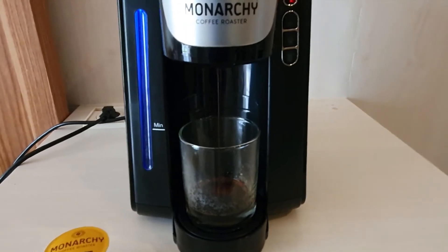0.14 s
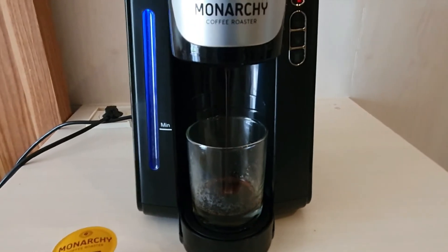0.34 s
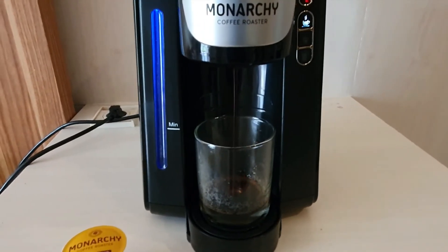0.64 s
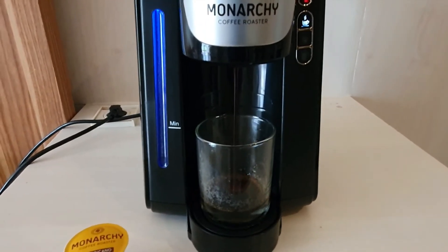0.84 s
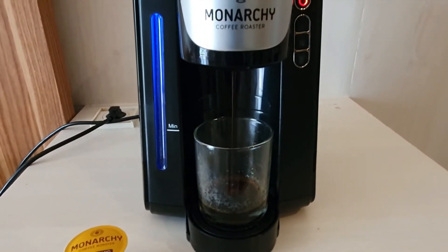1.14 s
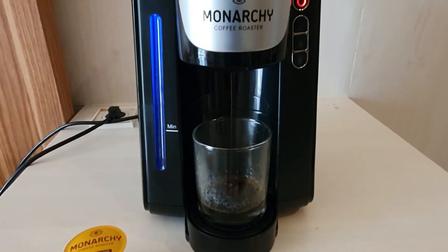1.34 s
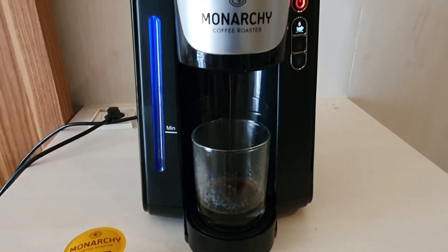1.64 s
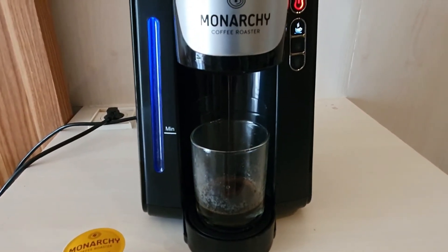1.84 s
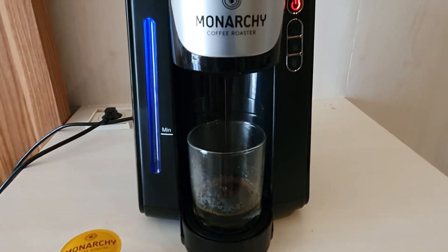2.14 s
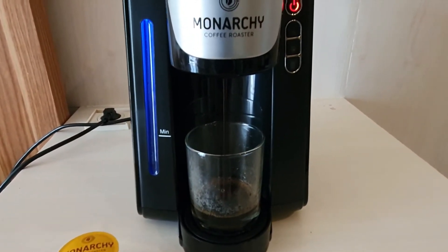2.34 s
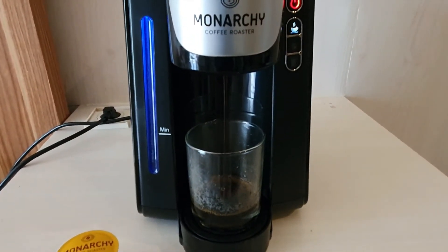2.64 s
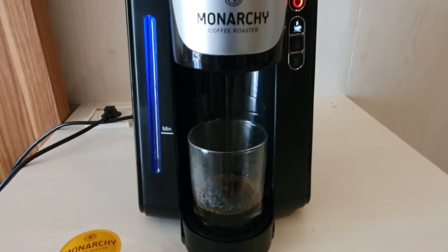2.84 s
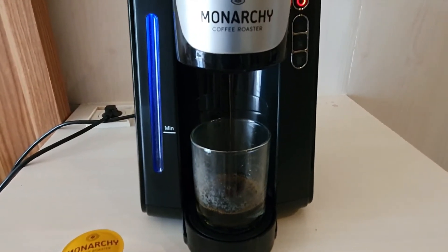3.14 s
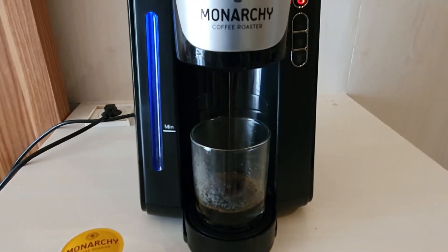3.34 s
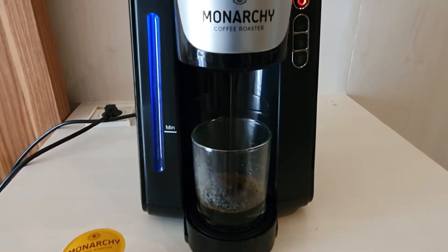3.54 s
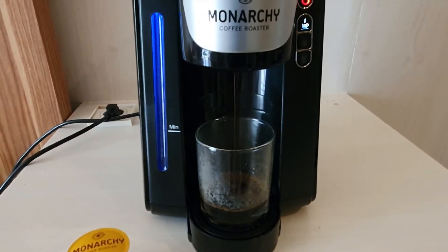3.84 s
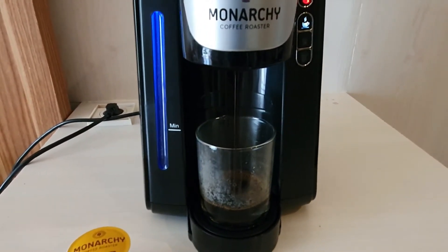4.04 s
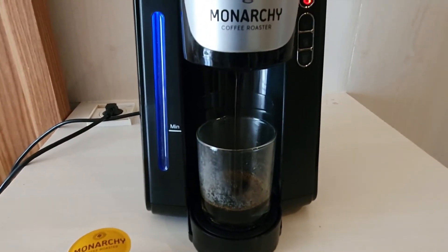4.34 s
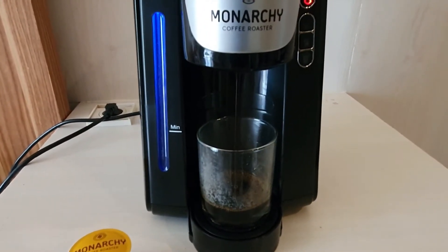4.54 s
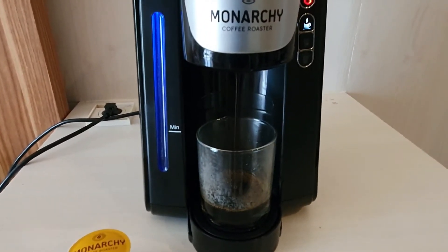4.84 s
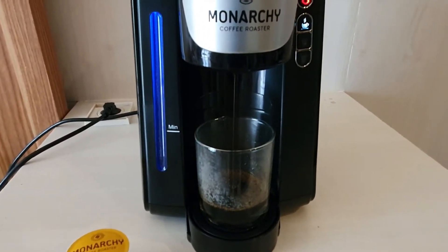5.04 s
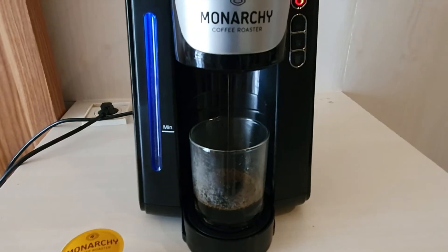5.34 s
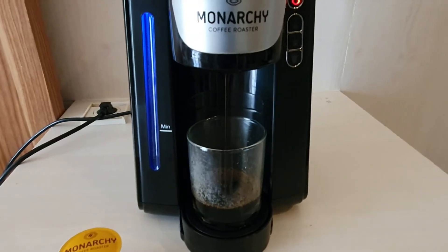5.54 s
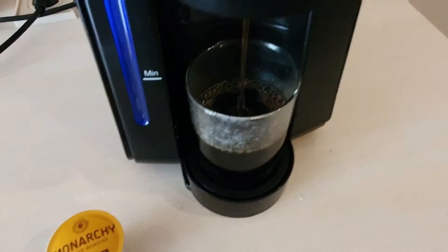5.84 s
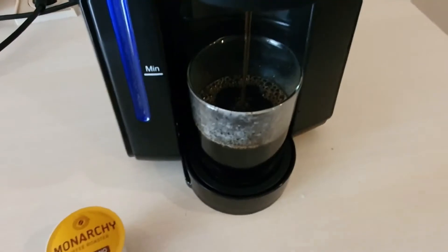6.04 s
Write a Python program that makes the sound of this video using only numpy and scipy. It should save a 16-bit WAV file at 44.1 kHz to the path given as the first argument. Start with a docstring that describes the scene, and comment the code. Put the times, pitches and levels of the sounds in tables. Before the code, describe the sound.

In a small room, coffee trickles from a nearby coffee maker into a glass, with a light hiss and fine spattering ticks. Small plops and bright plinks soon join in and build into a busy, gentle gurgle as the ticks thin out. The pump's low hum and the rumble of water inside the machine run throughout, turning closer and louder in the last moment.

```python
"""A small room: a capsule coffee maker runs a thin stream of coffee into a glass standing in its bay.
As the pool deepens, the stream drags in ever larger bubbles that plop; small ones burst at the surface
and spray ticks on the glass. The air in the glass rings, and the bay and the room reflect the pour.
The stream hisses, the pump hums on the mains and water rumbles inside the machine.
Near the end the machine is heard from closer, and its hum and rumble grow louder."""
import sys
import numpy as np
from scipy import signal
from scipy.fft import rfft, irfft
from scipy.io import wavfile

SR = 44100
rng = np.random.default_rng(int(sys.argv[2]) if len(sys.argv) > 2 else 0)


def bounce(signal):
    """Save signal as a 16-bit WAV file at the path given by the first command-line argument."""
    frames = np.transpose(np.atleast_2d(signal))
    limited = np.clip(frames, -1, 1)
    pcm = np.round(limited * 32767).astype(np.int16)
    wavfile.write(sys.argv[1], SR, pcm)


N = 272634
TIME_S = np.arange(N) / SR
CUTOFF_HZ = 16000


def from_db(db):
    """Decibels to gain."""
    return 10 ** (np.asarray(db) / 20)


def unit_rms(x):
    """Scale to rms 1."""
    return x / np.sqrt(np.mean(x ** 2) + 1e-20)


def panned(pan_db):
    """Left and right gains as a column; positive is left."""
    return from_db(np.array([[pan_db], [-pan_db]]) / 2)


def at_hz(points, hz):
    """Read a table on a log-frequency axis."""
    knots_hz, values = np.transpose(points)
    return np.interp(np.log(np.maximum(hz, 1)), np.log(knots_hz), values)


def add(out, start_s, sound):
    """Mix in a short stereo sound."""
    start = int(np.clip(round(start_s * SR), 0, N - 1))
    out[:, start:start + sound.shape[1]] += sound[:, :N - start]


def ring(hz, t60_s, onset_s, rise=0):
    """Damped sine. A bubble nearing the surface climbs in pitch, by the share `rise` per t60."""
    t = np.arange(int(1.5 * t60_s * SR)) / SR
    envelope = (1 - np.exp(-t / onset_s)) * from_db(-60 * t / t60_s)
    phase = 2 * np.pi * hz * t * (1 + rise * t / t60_s / 2)
    return envelope / envelope.max() * np.sin(phase)


def resonate(x, hz, width_hz):
    """Two-pole resonance, peak gain 1."""
    radius, angle = np.exp(-np.pi * width_hz / SR), 2 * np.pi * hz / SR
    numerator = np.array([1, 0, -1]) * (1 - radius ** 2) / 2
    return signal.lfilter(numerator, [1, -2 * radius * np.cos(angle), radius ** 2], x + 1e-18)


def grains(per_s, low_hz, high_hz, width_share, spread_db, bands=14):
    """Random clicks of uneven size, each ringing one of a range of pitches; rms 1."""
    sizes = from_db(spread_db * np.minimum(rng.exponential(1, N), 3)) * rng.choice([-1, 1], N)
    clicks = sizes * (rng.random(N) < per_s / SR)
    band_of = rng.integers(0, bands, N)
    out = np.zeros((2, N))
    for band, hz in enumerate(np.geomspace(low_hz, high_hz, bands)):
        rings = resonate(clicks * (band_of == band), hz, hz * width_share)
        out += panned(rng.normal(0, 1.3)) * rings / np.sqrt(hz)
    return unit_rms(out)


# Large bubbles. Each row: start in seconds, relative level in dB, pitch in Hz.
LARGE_BUBBLES = [(1.074, -27, 1510), (1.214, -32, 1600), (1.632, -25, 1650), (1.746, -25, 1520),
                 (1.777, -17, 1436), (2.302, -30.5, 1510), (2.444, -20.5, 1470), (2.584, -28.5, 1420),
                 (2.789, -27, 1250), (2.811, -16.5, 1450), (2.825, -20, 1490), (2.921, -20, 1390),
                 (2.955, -20, 1515), (3.019, -21, 1470), (3.075, -18, 1305), (3.09, -20.5, 1520),
                 (3.378, -22, 1085), (3.443, -25, 1540), (3.516, -24.5, 1430), (3.82, -21, 1474),
                 (3.839, -22.5, 1530), (3.937, -27, 1520), (3.994, -31, 954), (4.16, -27.5, 1060),
                 (4.342, -19, 1093), (4.403, -19, 1405), (4.48, -27, 1180), (4.543, -28, 1190),
                 (4.701, -31, 1005), (4.869, -24, 1480), (4.977, -21, 1107), (5.066, -32.5, 810),
                 (5.14, -19.5, 1600), (5.178, -21.5, 1480), (5.222, -27.5, 1520), (5.325, -24, 950),
                 (5.374, -27.5, 1180), (5.423, -20.5, 1200), (5.466, -23, 1210), (5.487, -17.5, 1480),
                 (5.504, -26.5, 968), (5.528, -25.5, 1085), (5.585, -24, 980), (5.605, -22.5, 1000),
                 (5.627, -23.5, 1480), (5.743, -18.5, 1230), (5.819, -17, 1018), (5.871, -31, 1010),
                 (5.884, -23, 1020), (5.897, -24, 1180), (5.931, -28.5, 1050), (6.061, -24, 1095)]


def plops(t60_at_1khz_s=0.025, onset_s=0.0004, slap_db=-7.5, centre_hz=1580, pan_db_per_octave=18):
    """A large bubble pinches off with a slap, then rings: the larger, the longer and further right."""
    out = np.zeros((2, N))
    slap = from_db(slap_db) * ring(hz=1130, t60_s=0.004, onset_s=onset_s)
    for start_s, level_db, hz in LARGE_BUBBLES + soft_plops():
        gain = from_db(level_db) * panned(pan_db_per_octave * np.log2(hz / centre_hz))
        add(out, start_s, gain * ring(hz, t60_at_1khz_s * 1000 / hz, onset_s, rise=0.04))
        add(out, start_s, gain * slap)
    muffle = signal.butter(4, 2150, fs=SR, output="sos")   # born under the surface, they sound dull
    return signal.sosfilt(muffle, out)


def soft_plops(count=66, from_s=1.0, above_churn_db=5.5, spread_db=2.0,
               pitch_hz=1773, spread_octaves=0.36, sink_octaves_per_s=0.1215):
    """Rows of softer plops that follow the churn, more frequent and deeper as the pool fills."""
    share = (np.arange(count) + rng.random(count)) / count
    start_s = from_s + (N / SR - from_s) * share ** (2 / 3)
    strength, detune = rng.uniform(-1, 1, (count, 2)).T
    level_db = churn_db(start_s) + above_churn_db + spread_db * strength
    hz = pitch_hz * 2 ** (spread_octaves * detune - sink_octaves_per_s * start_s)
    return list(zip(start_s, level_db, hz))


# Bursting bubbles. Each row: start in seconds, relative level in dB, pitch in Hz, left over right in dB.
SMALL_BUBBLES = [(0.5422, -43, 3070, -10), (0.9724, -32.5, 2830, 5.5), (1.6225, -36.5, 3400, 0),
                 (1.8323, -27.5, 2900, 2.5), (2.1108, -37, 3550, -12), (3.039, -32.5, 3180, -9),
                 (3.2551, -38, 3730, 14), (3.3446, -42, 4950, -1), (3.411, -35, 3200, -8),
                 (3.4427, -32, 2950, -6), (3.4448, -33, 3750, -14), (3.682, -32, 5630, 4),
                 (3.788, -37.5, 5730, 4), (3.9507, -34.5, 3150, -2), (4.2901, -43, 8500, -16),
                 (4.4578, -42, 8250, -11), (4.645, -43.5, 2800, 17), (4.787, -37, 3720, 7.5),
                 (5.1275, -31, 3360, 11.5), (5.2083, -35.5, 3160, -8.5), (5.262, -38.5, 3440, 10),
                 (5.3742, -40, 3160, -11), (5.3991, -39.5, 3160, 10), (5.466, -40.5, 5940, 5),
                 (5.5682, -38, 3360, 7), (5.7019, -36.5, 3370, -6)]


def plinks(gain_db=6.0, t60_at_3khz_s=0.015, onset_s=0.0001, snap_db=-8.0, snap_t60_s=0.0059):
    """Small bubbles snap open at the surface and give short, rising rings; the highest die first."""
    out = np.zeros((2, N))
    for start_s, level_db, hz, pan_db in SMALL_BUBBLES + soft_plinks():
        t60_s = t60_at_3khz_s * (3000 / hz) ** 0.7
        gain = from_db(level_db + gain_db) * panned(pan_db)
        add(out, start_s, gain * ring(hz, t60_s, onset_s, rise=0.32))
        add(out, start_s, gain * from_db(snap_db) * ring(hz, snap_t60_s, onset_s))
    return out


def soft_plinks(count=60, level_db=-46.5, spread_db=2.5, pitch_hz=3220, spread_octaves=0.37, pan_db=14):
    """Rows of fizz: fainter bursts at random all over the pool."""
    jitter, strength, detune, place = rng.uniform(-1, 1, (count, 4)).T
    start_s = N / SR * (np.arange(count) + (1 + jitter) / 2) / count
    hz = pitch_hz * 2 ** (spread_octaves * detune)
    return list(zip(start_s, level_db + spread_db * strength, hz, pan_db * place))


# Droplets. Each row: start in seconds, relative tick and splat levels in dB, tick pitch in Hz.
DROPLETS = [(0.0634, -48, -30.5, 12700), (0.182, -32.5, -59, 12900), (0.2108, -49, -43, 11900),
            (0.3104, -49, -31.5, 12600), (0.3733, -19.5, -28, 13500), (0.4493, -32, -52, 11600),
            (0.528, -44, -31.5, 13500), (0.5768, -28, -29.5, 13200), (0.668, -51, -30, 11500),
            (0.7625, -19, -33, 12500), (1.026, -32, -55, 14000), (1.057, -32, -55, 13600),
            (1.2873, -34.5, -45, 13600), (1.4746, -40, -36, 11600), (1.6232, -40, -32.5, 13200),
            (1.833, -42.5, -29.5, 12700), (1.952, -25.5, -30, 9000), (2.109, -41, -34.5, 12800),
            (2.3496, -32, -31, 11700), (2.4643, -38, -53, 14700), (2.544, -33, -57, 12000),
            (3.4432, -46, -51, 11600), (3.8197, -43, -33.5, 11600), (3.9464, -41, -34, 12900),
            (4.2903, -51, -38, 13500), (4.788, -34, -59, 12800), (5.1093, -35, -50, 11800),
            (5.4235, -38, -41, 11800), (5.8182, -44, -35, 11600), (6.0793, -35.5, -54, 11200)]


def droplets(tick_gain_db=8.5, splat_gain_db=6.0, knock_gain_db=-7.0, pan_db=-4.5, onset_s=0.00003):
    """A droplet hits the glass with a bright tick, a dry splat and a small knock tied to the splat."""
    out, place = np.zeros((2, N)), panned(pan_db)
    knock = ring(hz=3200, t60_s=0.0028, onset_s=onset_s)
    for start_s, tick_db, splat_db, tick_hz in DROPLETS + soft_droplets():
        splat_hz = 6900 * 2 ** (0.14 * rng.uniform(-1, 1))
        tick = ring(tick_hz, t60_s=0.0015, onset_s=onset_s)
        splat = -ring(splat_hz, t60_s=0.0018, onset_s=onset_s)
        add(out, start_s, place * from_db(tick_db + tick_gain_db) * tick)
        add(out, start_s, place * from_db(splat_db + splat_gain_db) * splat)
        add(out, start_s, place * from_db(splat_db + knock_gain_db) * knock)
    return out


def soft_droplets(count=44, tick_db=-44, splat_db=-41.5, spread_db=2.5, growth_db_per_s=0.5,
                  tick_hz=13100, spread_octaves=0.083):
    """Rows of lighter droplets, rarer and slightly louder as the pool fills."""
    share = (np.arange(count) + rng.random(count)) / count
    start_s = N / SR * share ** (3 / 2)
    tick_strength, splat_strength, detune = rng.uniform(-1, 1, (count, 3)).T
    ticks_db = tick_db + spread_db * tick_strength + growth_db_per_s * start_s
    splats_db = splat_db + spread_db * splat_strength + growth_db_per_s * start_s
    return list(zip(start_s, ticks_db, splats_db, tick_hz * 2 ** (spread_octaves * detune)))


# Bubbling of the pool. Each row: time in seconds, relative level in dB.
CHURN_LEVELS = [(0, -46), (1.5, -46), (2.6, -40.5), (3.0, -34.5), (3.3, -38.5), (4.3, -37), (5.0, -39.5),
                (5.55, -33.5), (6.18, -41)]


def churn_db(time_s):
    """The stream drags more air under, in surges, as the pool deepens."""
    return np.interp(time_s, *np.transpose(CHURN_LEVELS))


def burble(gain_db=-12.5):
    """Tiny bubbles ring in the churning pool."""
    bubbles = grains(per_s=120, low_hz=965, high_hz=1650, width_share=0.12, spread_db=1.5)
    return from_db(churn_db(TIME_S) + gain_db) * bubbles


def spray(level_db=-63.5, fade_db_per_s=0.7):
    """The finest droplets tick faintly, fading as the deepening pool cushions the stream."""
    mist = grains(per_s=120, low_hz=6500, high_hz=15000, width_share=0.5, spread_db=5.5)
    return from_db(level_db - fade_db_per_s * TIME_S) * mist


# Pump overtones. Each row: multiple of the mains, level in dB, left over right in dB, close level in dB.
PUMP_OVERTONES = [(2, -34.5, 1, -29), (3, -83, -8, -62), (4, -34.5, -1.5, -31.5), (5, -40.5, 2.5, -37.5),
                  (6, -55.5, 4, -46), (7, -61.5, -23, -50.5), (9, -57.5, -2, -71), (10, -47.5, 3.5, -47),
                  (11, -51.5, 8.5, -48), (12, -75, -6, -70), (14, -61, -11, -69), (15, -62, -17, -56.5),
                  (16, -76, -8, -48.5), (17, -99, -10, -58), (18, -74, 8.5, -72)]


def pump(closeness, mains_hz=49.97, waver_share=0.014, flutter_db=-66, waver_hz=9):
    """The pump strokes once a mains cycle; its casing sounds the overtones, which waver with the load."""
    out = np.zeros((2, N))
    mains_phase = 2 * np.pi * mains_hz * TIME_S
    for multiple, level_db, pan_db, close_db in PUMP_OVERTONES:
        gain = from_db(level_db + closeness * (close_db - level_db))
        unrest = waver_share * gain + from_db(flutter_db)
        amplitude = gain + unrest * (drift(waver_hz) + 1j * drift(waver_hz))
        phase = multiple * mains_phase + rng.uniform(0, 2 * np.pi)
        out += panned(pan_db) * np.sqrt(2) * np.real(amplitude * np.exp(1j * phase))
    return out


def drift(rate_hz):
    """Slow random wander; rms 1."""
    knots = rng.standard_normal(4096)
    return unit_rms(np.interp(TIME_S * rate_hz, np.arange(len(knots)), knots))


# Water noise in the machine. Each row: frequency in Hz, density in dB per Hz.
RUMBLE_SPECTRUM = [(15, -85), (26, -81), (42, -61.5), (80, -65), (170, -63.5), (290, -67), (342, -66),
                   (395, -71), (520, -67.5), (640, -71), (790, -69), (940, -76.5), (1500, -79.5),
                   (4000, -104)]


def rumble(closeness, close_gain_db=3.5):
    """Water rumbles in the heater and tubes, louder from close by."""
    return from_db(close_gain_db * closeness) * noise(RUMBLE_SPECTRUM)


# Noise of the stream. Each row: frequency in Hz, relative density in dB.
HISS_SPECTRUM = [(600, -90), (1100, -74.5), (1600, -74), (2400, -84), (3000, -81), (4000, -84.5),
                 (5000, -92), (7000, -92.5), (8500, -102), (10500, -104), (12500, -102), (15500, -105)]


def stream_hiss(gain_db=-2.0):
    """The thin stream hisses steadily."""
    return from_db(gain_db) * noise(HISS_SPECTRUM)


# Likeness of left and right. Each row: frequency in Hz, correlation from -1 to 1.
STEREO_CORRELATION = [(60, 0.96), (130, 0.95), (290, 0.83), (640, -0.12), (1410, -0.69), (3100, 0.21),
                      (15000, -0.55)]


def noise(spectrum):
    """Stereo noise of a given density, alike in both channels in the bass and wide higher up."""
    hz = np.fft.rfftfreq(N, 1 / SR)
    mid, side = rfft(rng.standard_normal((2, N)))
    alike = at_hz(STEREO_CORRELATION, hz)
    pair = np.sqrt(1 + alike) * mid + np.sqrt(1 - alike) * side * np.array([[1], [-1]])
    return irfft(pair * from_db(at_hz(spectrum, hz)), N) * np.sqrt(SR) / 2


# Air resonances of the glass. Each row: frequency in Hz, width in Hz, gain in dB.
GLASS_MODES = [(990, 70, -9), (1160, 80, -14), (1535, 90, -8), (3150, 220, -10), (3620, 220, -9)]


def glass(x):
    """The air in the glass rings on after each splash."""
    return x + sum(from_db(gain_db) * resonate(x, hz, width_hz) for hz, width_hz, gain_db in GLASS_MODES)


def scatter(x, direct_gain=0.3, t60_s=0.011):
    """A click bounces round inside the glass for a few milliseconds."""
    t = np.arange(SR // 100) / SR
    bounces = rng.standard_normal((2, len(t))) * from_db(-60 * t / t60_s)
    bounced = signal.fftconvolve(x, unit_rms(bounces) / np.sqrt(len(t)), axes=1)[:, :N]
    return direct_gain * x + np.sqrt(1 - direct_gain ** 2) * bounced


# Direct and reflected paths. Each row: channel (0 is left), delay in seconds, gain in dB.
BAY_PATHS = [(0, .00016, 0), (0, .0019, -11), (0, .0028, -10), (0, .0107, -16), (0, .025, -19), (1, 0, 0),
             (1, .00195, -9), (1, .00265, -11), (1, .0132, -16), (1, .0245, -20)]


def bay(x):
    """The pour arrives directly and off the bay, the table and the near walls."""
    out = np.zeros((2, N))
    for channel, delay_s, gain_db in BAY_PATHS:
        lag = int(delay_s * SR)
        out[channel, lag:] += from_db(gain_db) * x[channel, :N - lag]
    return out


# Room decay. Each row: frequency in Hz, t60 in seconds.
ROOM_DECAY = [(300, 0.51), (1500, 0.13), (5000, 0.17), (14000, 0.21)]


def room(x, gain_db=-8.5, first_echo_s=0.0081):
    """A diffuse tail that lasts longest in the bass."""
    t, tail = np.arange(SR // 2) / SR, 0
    edges_hz = np.geomspace(250, CUTOFF_HZ, 7)
    for low_hz, high_hz in zip(edges_hz, edges_hz[1:]):
        bandpass = signal.butter(2, [low_hz, high_hz], "band", fs=SR, output="sos")
        band = signal.sosfilt(bandpass, rng.standard_normal((2, len(t))))
        t60_s = at_hz(ROOM_DECAY, np.sqrt(low_hz * high_hz))
        tail = tail + band * from_db(-60 * t / t60_s)
    tail = unit_rms(tail * (t > first_echo_s)) / np.sqrt(len(t))
    return from_db(gain_db) * signal.fftconvolve(x, tail, axes=1)[:, :N]


def scene(close_from_s=5.885, approach_s=0.036):
    """The pour, coloured by glass, bay and room, over the machine and the hiss of the stream."""
    closeness = np.clip((TIME_S - close_from_s) / approach_s, 0, 1)
    machine = pump(closeness) + rumble(closeness)
    bubbling, mist, hiss = burble(), spray(), stream_hiss()
    pool = plops() + plinks() + bubbling
    splashes = scatter(droplets() + mist)
    pour = glass(pool + splashes)
    return bay(pour) + room(pour) + machine + hiss


def record(dry):
    """Steep low-pass on the top treble."""
    return signal.sosfilt(signal.ellip(12, 0.1, 80, CUTOFF_HZ, fs=SR, output="sos"), dry)


dry = scene()
out = record(dry)
bounce(out)
```